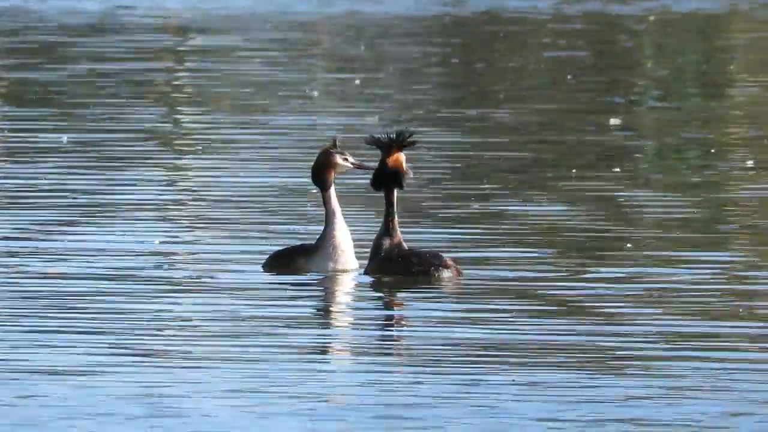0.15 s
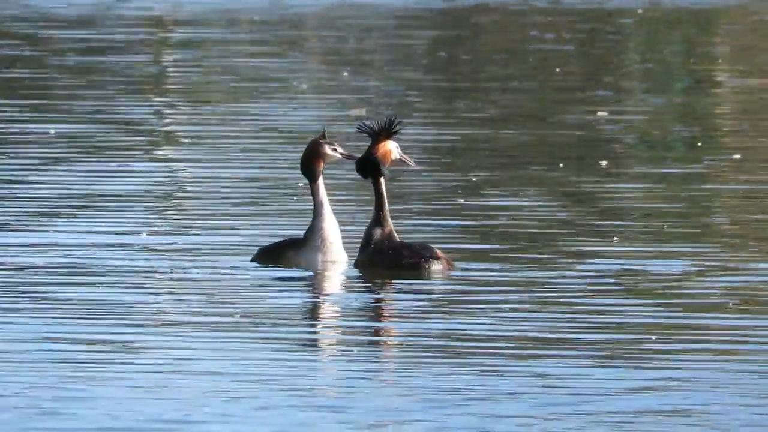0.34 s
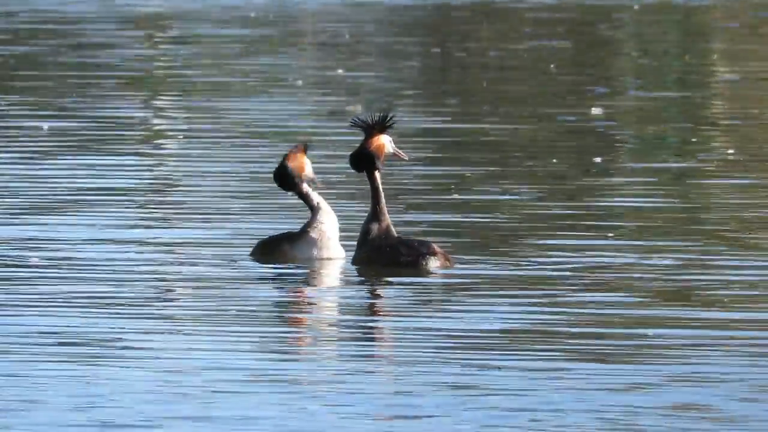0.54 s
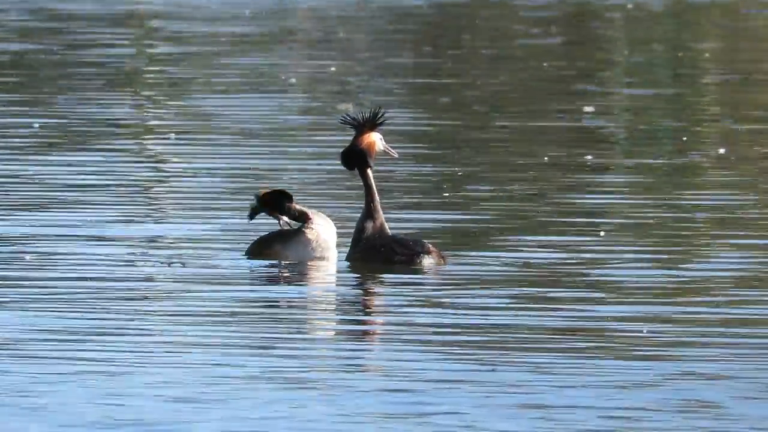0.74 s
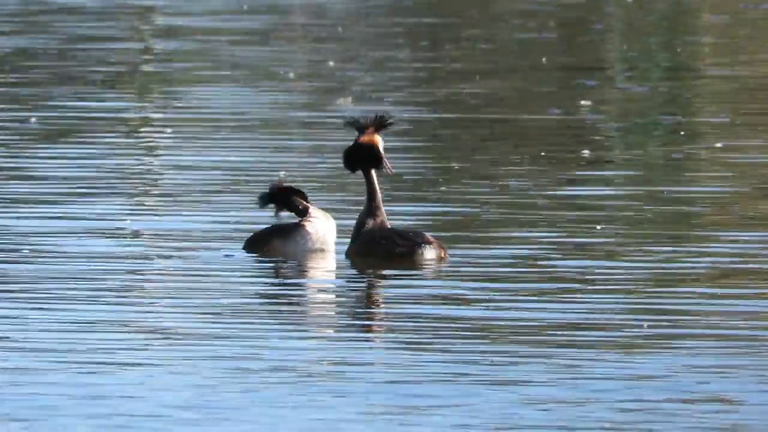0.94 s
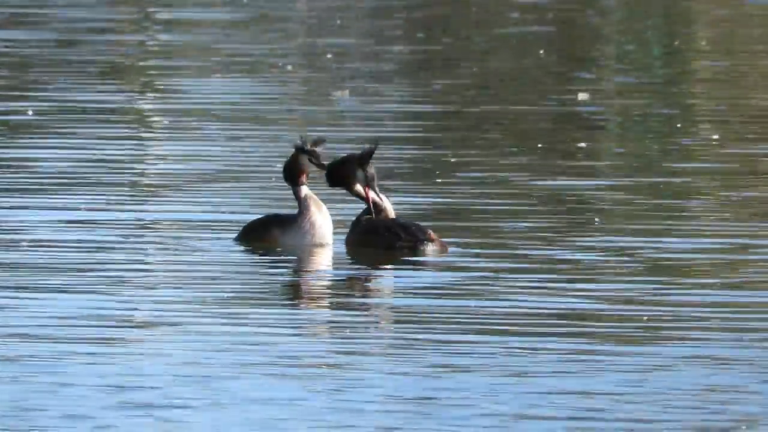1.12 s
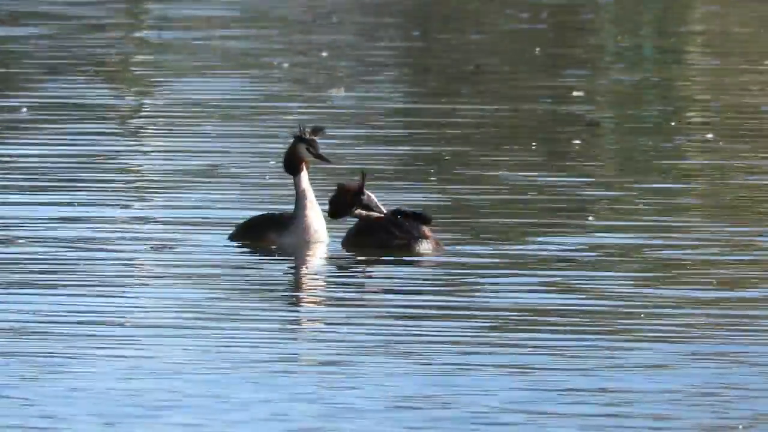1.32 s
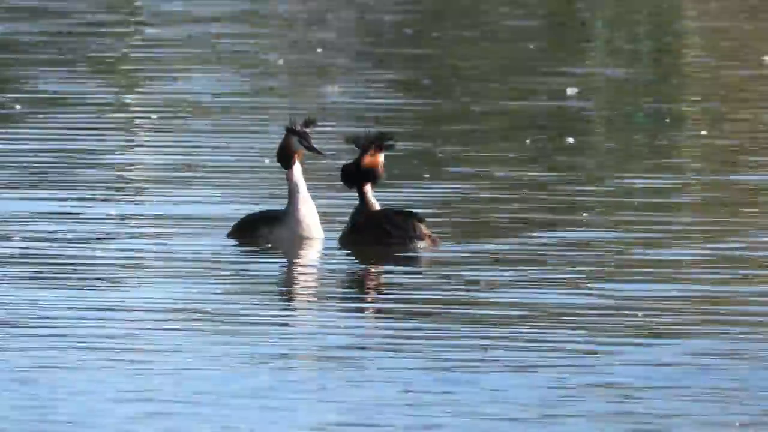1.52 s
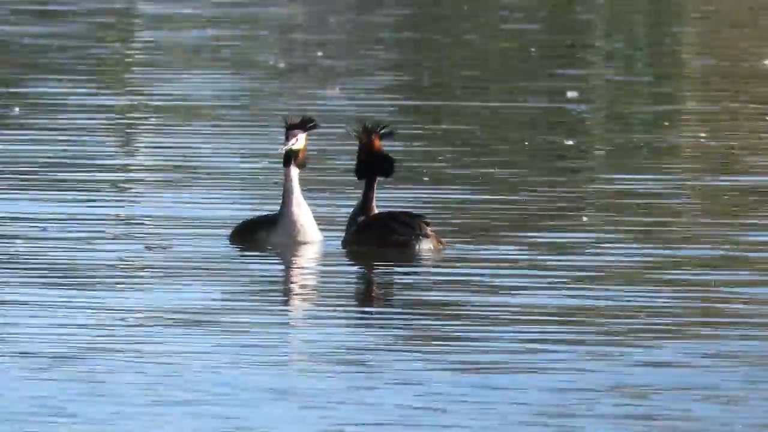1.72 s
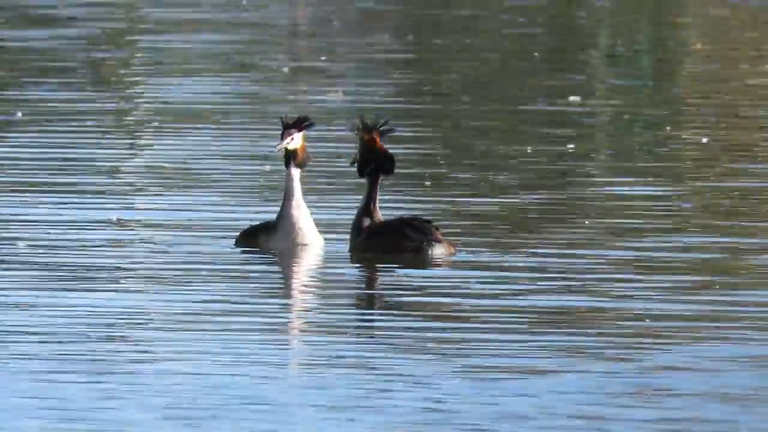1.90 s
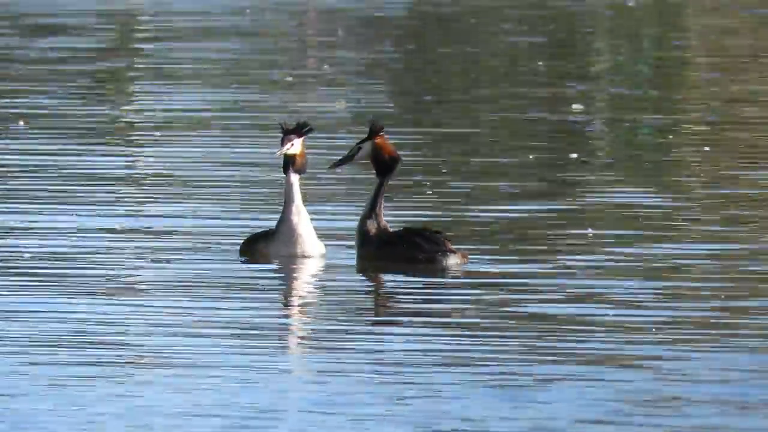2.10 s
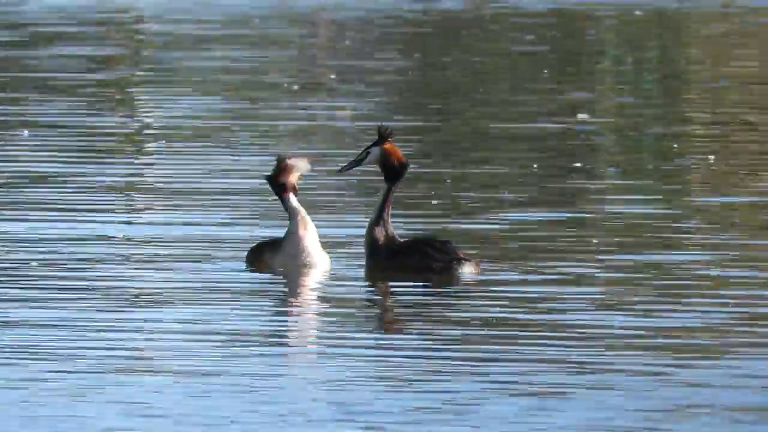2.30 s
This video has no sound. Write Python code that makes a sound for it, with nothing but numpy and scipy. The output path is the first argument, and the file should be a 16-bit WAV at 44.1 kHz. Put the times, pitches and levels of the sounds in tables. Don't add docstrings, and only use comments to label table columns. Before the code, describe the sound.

Bird calls across open water: a constant see-saw of high and low chirps, distant whistled slurs mid-way, a few nasal yelps and faint croaks, over lumpy wind rumble on the microphone and soft distant hum.

```python
import sys
import numpy as np
from scipy import signal
from scipy.fft import rfft, irfft
from scipy.io import wavfile

SR = 44100
rng = np.random.default_rng(int(sys.argv[2]) if len(sys.argv) > 2 else 0)


def natural_amplitude(level_db):
    exponent = np.asarray(level_db, float) / 20
    return 10 ** exponent


def file_out(sig):
    cols = np.atleast_2d(sig).T
    lim = np.clip(cols, -1, 1)
    pcm = np.round(lim * 32767).astype(np.int16)
    wavfile.write(sys.argv[1], SR, pcm)


N = 103635
T = np.arange(N) / SR


def rms_one(x):
    return x / np.sqrt(np.mean(x ** 2) + 1e-20)


def at_hz(points, hz):
    table_hz, value = np.transpose(points)
    return np.interp(np.log(hz), np.log(table_hz), value)


def drift(rate_hz):
    r = np.exp(-80 * np.pi * rate_hz / SR)
    slow = signal.lfilter([1], [1, -2 * r, r * r], rng.standard_normal(N // 40 + 2002))
    slow = rms_one(slow[2000:])
    return np.interp(np.arange(N) / 40, np.arange(len(slow)), slow)


def coloured(spectrum, size):
    hz = np.maximum(np.fft.rfftfreq(N, 1 / SR), 1)
    (low_hz, low_db), (high_hz, high_db) = spectrum[0], spectrum[-1]
    points = [(low_hz / 2, low_db - 30)] + list(spectrum) + [(high_hz * 1.2, high_db - 30)]
    return rfft(rng.standard_normal((size, N))) * natural_amplitude(at_hz(points, hz)), hz


def envelope(s, length_s):
    attack_s, release_s, sag_db = .004, .015, -4
    t = T - s
    attack = np.clip(t / attack_s, 0, 1)
    release = np.clip((length_s + release_s - t) / release_s, 0, 1)
    return (attack * release) ** 2 * natural_amplitude(sag_db * np.clip(t / length_s, 0, 1))


def sine(hz, db):
    hz = hz * (1 + .004 * drift(60))
    return np.sqrt(2) * natural_amplitude(db) * np.sin(2 * np.pi * (np.cumsum(hz) / SR + rng.random()))


def straight(u):
    return u


def slur(s, length_s, from_hz, to_hz, db, shape=straight):
    path = shape(np.clip((T - s) / length_s, 0, 1))
    return envelope(s, length_s) * sine(from_hz + (to_hz - from_hz) * path, db)


def place(x, pan_db, lag_s):
    bank_t60_s, bank_db, bank_delay_s, bank_likeness = .6, -5, .004, .7
    x = x * natural_amplitude(1.8 * drift(70))
    t = T[:SR // 2]
    mid, side = rng.standard_normal((2, len(t))) * natural_amplitude(-60 * t / bank_t60_s) * (t > bank_delay_s)
    scatter = np.sqrt(1 + bank_likeness) * mid + np.sqrt(1 - bank_likeness) * side * [[1], [-1]]
    scatter = scatter / np.sqrt(np.sum(scatter[0] ** 2))
    left, right = x + natural_amplitude(bank_db) * signal.fftconvolve(x[None], scatter, axes=1)[:, :N]
    hz = np.fft.rfftfreq(N, 1 / SR)
    late = irfft(rfft(right) * np.exp(-2j * np.pi * hz * lag_s), N)
    return np.array([left, late]) * natural_amplitude([[pan_db / 2], [-pan_db / 2]])


# (time [s], length [s], level [dB])
HIGH_NOTES = [(0.05, 0.089, -50), (.318, 0.083, -52), (0.577, 0.082, -51.5), (0.842, 0.074, -51.5),
              (1.096, 0.083, -52), (1.36, 0.099, -53), (1.62, 0.097, -52.5), (1.893, 0.082, -52),
              (2.164, 0.077, -51.5)]
# (line number [-], level [dB])
BUZZ_LINES = [(-1, -2), (0, 1.5), (1, -7)]
# (time [s], length [s], level [dB])
LOW_NOTES = [(0.211, 0.078, -56.5), (0.474, 0.066, -55), (0.745, 0.069, -61), (1.001, 0.033, -50.5),
             (1.256, 0.085, -55), (1.516, 0.1, -55.5), (1.791, 0.057, -57), (2.062, 0.075, -56)]


def songbird():
    start_hz, rise_hz, rise_s, buzz_hz, buzz_grows_s = 3860, 140, .025, 215, .018
    low_end_hz, low_fall_hz, low_fall_s, low_waver_hz = 2854, 423, .022, 110
    out = np.zeros(N)
    for s, length_s, db in HIGH_NOTES:
        t = np.clip(T - s, 0, 1)
        buzz = np.clip(t / buzz_grows_s, 0, 1)
        this_rise_hz = rise_hz * (1 + .25 * rng.standard_normal())
        hz = start_hz + 35 * drift(23.2) + this_rise_hz * (1 - np.exp(-t / rise_s))
        note = np.zeros(N)
        for k, line_db in BUZZ_LINES:
            flutter_db = 2.5 * drift(90)
            note += sine(hz + k * buzz_hz, db + line_db - 4.5 + flutter_db) * buzz ** abs(k)
        out += envelope(s, length_s) * note
    for s, length_s, db in LOW_NOTES:
        t = np.clip(T - s, 0, 1)
        waver_hz = low_waver_hz * drift(45) * np.clip(t / length_s, 0, 1)
        hz = low_end_hz + low_fall_hz * np.exp(-t / low_fall_s) + waver_hz
        out += envelope(s, length_s) * sine(hz, db)
    return place(out, pan_db=-2.5, lag_s=5.5e-5)


def hook(u):
    return .78 * u + .22 * u ** 7


def flatten(u):
    return 1 - (1 - u) ** 1.5


def warble():
    start_s, length_s, note_s, low_hz, span_hz, db = .685, .26, .014, 2850, 750, -55
    out = np.zeros(N)
    for k, (a, b, c) in enumerate(rng.random((24, 3))):
        s = start_s + length_s * (k + a) / 24
        out += slur(s, note_s, low_hz + span_hz * b, low_hz + span_hz * (b + c) / 2, db)
    return out


# (time [s], length [s], from [Hz], to [Hz], level [dB])
HOOKED = [
    (.525, 0.066, 6950, 6130, -64),
    (0.733, .167, 7040, 5500, -59.5),
]
# (time [s], length [s], from [Hz], to [Hz], level [dB])
FLATTENED = [
    (.652, 0.091, 5590, 4780, -64.5),
    (0.854, 0.12, 5470, 4940, -63.5),
    (.995, .123, 5610, 4580, -53.5),
]
# (time [s], length [s], from [Hz], to [Hz], level [dB])
PIPES = [(.935, .07, 3310, 3290, -53), (1.035, .055, 3180, 3110, -56), (.655, .03, 2860, 2850, -55),
         (.65, .045, 2460, 2430, -58), (.793, .03, 2400, 2560, -58), (.84, .03, 1230, 1260, -52),
         (1.965, .03, 2270, 2220, -58), (1.745, .035, 1900, 1900, -57), (1.74, .055, 4280, 4080, -60),
         (1.997, .055, 4200, 4020, -62), (.572, .04, 3350, 3330, -60), (.745, .06, 2850, 2830, -57),
         (2.2, .045, 2340, 2330, -61), (2.098, .012, 900, 860, -52), (2.122, .014, 1170, 1140, -55),
         (2.146, .014, 1090, 1070, -55), (2.162, .02, 960, 950, -53), (.302, .012, 570, 520, -48),
         (.345, .018, 970, 950, -54), (.13, .1, 970, 960, -57), (.105, .03, 2520, 2450, -59),
         (.7, .22, 3330, 3300, -60), (.7, .09, 2480, 2450, -61)]


def whistlers():
    slurs = sum(slur(*row, hook) for row in HOOKED) + sum(slur(*row, flatten) for row in FLATTENED)
    far = sum(slur(*row) for row in PIPES) + warble()
    return place(slurs, pan_db=-3, lag_s=5e-5) + place(far, pan_db=-1.4, lag_s=1.5e-5)


# (time [s], length [s], from [Hz], to [Hz], level [dB])
YELPS = [
    (.402, .065, 930, 805, -49),
    (1.088, .075, 1020, 835, -49),
    (1.78, .075, 930, 805, -47.5),
    (1.998, .04, 930, 830, -53),
    (2.058, .03, 900, 860, -58),
]
# (pitch fall [s], opening click [dB], shrill fourth part [dB])
YELP_MANNER = [
    (.033, -3, -20),
    (.016, 4, -14),
    (.032, 6, -4),
    (.04, 1.5, -7),
    (.04, 8, -20),
]
# (multiple [-], level [dB], change by the end [dB])
YELP_PARTS = [(1, -12, -3), (2, 1.5, -5), (3, -1, -4), (4, 0, -22)]


def yelps():
    out = np.zeros(N)
    band = signal.butter(3, [1600, 3500], "band", fs=SR, output="sos")
    puff = rms_one(signal.sosfilt(band, rng.standard_normal(N)))
    for (s, length_s, from_hz, to_hz, db), (fall_s, click_db, shrill_db) in zip(YELPS, YELP_MANNER):
        t = np.clip(T - s, 0, 1)
        hz = to_hz + (from_hz - to_hz) * np.exp(-(t / fall_s) ** 2)
        out += puff * natural_amplitude(db + click_db) * (T > s) * np.exp(-t / .004)
        stack = np.zeros(N)
        for k, part_db, loss_db in YELP_PARTS:
            stack += sine(k * hz, db + part_db + shrill_db * (k == 4) + loss_db * t / length_s)
        out += envelope(s, length_s) * stack
    return out


# (time [s], length [s], throat from [Hz], to [Hz], level [dB])
CROAKS = [
    (.008, .072, 1800, 2050, -46),
    (.575, .1, 1850, 1900, -53),
    (1.225, .06, 1750, 1950, -54),
    (1.31, .05, 1700, 1700, -54),
    (1.64, .08, 1700, 1950, -55),
    (2.165, .07, 1750, 2000, -53.5),
    (2.25, .08, 1950, 1900, -54),
]


def croaks():
    pulse_hz, rough, throat_width_hz, core = 180, .5, 150, .8
    cycles = np.cumsum(pulse_hz * (1 + .03 * drift(40))) / SR
    pulses = np.diff(np.floor(cycles), prepend=0) * natural_amplitude(2 * drift(90))
    source = rms_one(pulses) + rough * rng.standard_normal(N)
    lowpass = signal.butter(2, throat_width_hz, fs=SR, output="sos")
    ringing = rms_one(signal.sosfilt(lowpass, source - source.mean()))
    throat = rms_one(core + ringing)
    return sum(throat * slur(*row) for row in CROAKS)


def waterfowl():
    return place(yelps() + croaks(), pan_db=1.6, lag_s=-1e-5)


# (time [s], level [dB])
GUST = [(0, -44.5), (.17, -53), (.24, -38.5), (.43, -36.5), (.5, -29), (.65, -34.5), (.73, -32.5),
        (.9, -40), (1.03, -37.5), (1.06, -52), (1.2, -38), (1.3, -45), (1.44, -35), (1.62, -37),
        (1.645, -41.5), (1.7, -39.5), (2.16, -45), (2.21, -54)]
# (frequency [Hz], density [dB per Hz])
GUST_COLOUR = [(15, -69.5), (25, -43.5), (84, 1.5), (179, 3.5), (260, -4), (299, -8), (390, -11),
               (515, -33.5), (700, -25.5), (910, -69), (1540, -120)]
# (centre [s], peak [dB], width [s], frequency [Hz])
BUFFETS = [(0.248, -22, 0.0063, 214), (0.287, -22, 0.0039, 278), (0.311, -30, 0.007, 194),
           (0.342, -23.5, 0.0087, 172), (0.389, -30, 0.0083, 198), (0.406, -24, 0.0064, 223),
           (0.42, -28.5, 0.0037, 260), (0.432, -29, 0.0049, 145), (0.444, -27, 0.0032, 139),
           (0.46, -21.5, 0.0091, 201), (0.483, -15, 0.0066, 220), (0.494, -24, 0.0036, 227),
           (0.506, -14, 0.0052, 236), (0.522, -15, 0.0075, 275), (0.557, -29, 0.023, 218),
           (0.586, -20, 0.0053, 192), (0.6, -28.5, 0.0098, 190), (0.62, -30, 0.0054, 170),
           (0.637, -27.5, 0.0093, 205), (0.679, -20, 0.0039, 180), (0.689, -24, 0.0049, 225),
           (0.701, -24, 0.0062, 161), (0.71, -20, 0.0053, 165), (0.723, -13.5, 0.0065, 175),
           (0.736, -19.5, 0.0056, 231), (0.746, -19.5, 0.0077, 179), (0.757, -17, 0.0042, 204),
           (0.776, -28, 0.0072, 174), (0.784, -27, 0.005, 182), (0.811, -24, 0.0061, 181),
           (0.87, -23, 0.0064, 172), (0.88, -25, 0.011, 192), (1.017, -25.5, 0.015, 180),
           (1.033, -19, 0.0035, 250), (1.16, -19.5, 0.0032, 244), (1.227, -25, 0.0095, 235),
           (1.384, -25.5, 0.0056, 224), (1.453, -19, 0.004, 173), (1.468, -21.5, 0.0078, 147),
           (1.477, -18.5, 0.0025, 164), (1.516, -22, 0.0072, 173), (1.53, -21, 0.0057, 223),
           (1.571, -24, 0.01, 194), (1.59, -23, 0.0044, 173), (1.609, -22.5, 0.0045, 220),
           (1.618, -19.5, 0.0033, 246), (1.674, -24.5, 0.0066, 158), (1.906, -23.5, 0.0032, 251),
           (2.025, -27.5, 0.012, 147), (2.066, -28.5, 0.0081, 185)]
# (centre [s], peak [dB], width [s], frequency [Hz])
LATE_BUFFETS = [(1.202, -32.5, 0.0075, 196), (1.696, -29.5, 0.014, 195), (1.72, -30, 0.014, 203),
                (1.765, -28, 0.013, 159), (1.825, -27, 0.0075, 187), (1.964, -30.5, 0.0086, 176),
                (2.038, -31, 0.0047, 165), (2.096, -28, 0.004, 172), (2.16, -31.5, 0.016, 185),
                (2.262, -35, 0.014, 173)]
# (pitch ratio [-], level [dB])
BUFFET_PARTS = [(.65, -8), (1.0, -1), (1.55, -12)]
# (time [s], side minus mid [dB])
SWIRL = [(.2, -31), (.25, -18.5), (.9, -10), (.96, -28), (1.4, -22), (2.35, -12)]
# (low [Hz], high [Hz])
SWIRL_BAND_HZ = [143, 730]


def wind():
    side_rise, pan_db, sweep, spread = 1.4, -.6, .31, .48
    mid, side = irfft(coloured(GUST_COLOUR, size=2)[0], N)
    gain = natural_amplitude(np.interp(T, *np.transpose(GUST)) + 2.5 * drift(35))
    mid, side = gain * rms_one(mid), gain * rms_one(np.gradient(side))
    eddies = list(BUFFETS) + list(LATE_BUFFETS)
    for (s, db, width_s, hz), chance in zip(eddies, rng.random((len(eddies), 3, 3))):
        near = slice(int((s - 3 * width_s) * SR), int((s + 3 * width_s) * SR))
        t = T[near] - s
        u = t / (spread * width_s)
        for (ratio, part_db), (a, b, c) in zip(BUFFET_PARTS, chance):
            swing = natural_amplitude(db + part_db) * np.exp(-u ** 2 / 2)
            turns = ratio * hz * t * (1 + sweep * (c - .5) * np.clip(u, -3, 3))
            mid[near] += swing * np.cos(2 * np.pi * (turns + a))
            side[near] += swing * np.cos(2 * np.pi * (side_rise * turns + b))
    side = signal.sosfilt(signal.butter(2, SWIRL_BAND_HZ, "band", fs=SR, output="sos"), side)
    both = mid + side * natural_amplitude(np.interp(T, *np.transpose(SWIRL))) * [[1], [-1]]
    wind_cut = signal.butter(2, 70, "high", fs=SR, output="sos")
    return signal.sosfilt(wind_cut, both) * natural_amplitude([[pan_db / 2], [-pan_db / 2]])


# (frequency [Hz], correlation [-])
LIKENESS = [(60, 1.0), (180, 1), (530, 0.98), (1590, 0.93), (4750, -0.0016), (14200, -0.45)]


def hum(spectrum, db, patchy_db):
    (mid, side), hz = coloured(spectrum, size=2)
    alike = np.clip(at_hz(LIKENESS, hz), -1, 1)
    both = irfft(np.sqrt(1 + alike) * mid + np.sqrt(1 - alike) * side * [[1], [-1]], N)
    return natural_amplitude(db + patchy_db * drift(8.6)) * rms_one(both)


# (frequency [Hz], density [dB per Hz])
HUM_LOW = [(35, -35.5), (60, 0.5), (504, -8), (725, -9.5), (841, -5), (988, -5.5), (1090, -5), (1500, -16),
           (1950, -61.5), (3300, -120)]
# (frequency [Hz], density [dB per Hz])
HUM_HIGH = [(880, -29), (1500, -0.5), (2260, -7.5), (2920, -8), (3500, -13), (3930, -14.5), (4490, -18),
            (10200, -29), (14600, -37)]


def far_hum():
    return hum(HUM_LOW, db=-46.5, patchy_db=.7) + hum(HUM_HIGH, db=-54.5, patchy_db=.3)


def scene():
    return songbird() + whistlers() + waterfowl() + wind() + far_hum()


def roll_off(x):
    return signal.sosfilt(signal.butter(12, 14780, fs=SR, output="sos"), x)


def record(dry):
    return roll_off(dry)


dry = scene()
out = record(dry)
file_out(out)
```